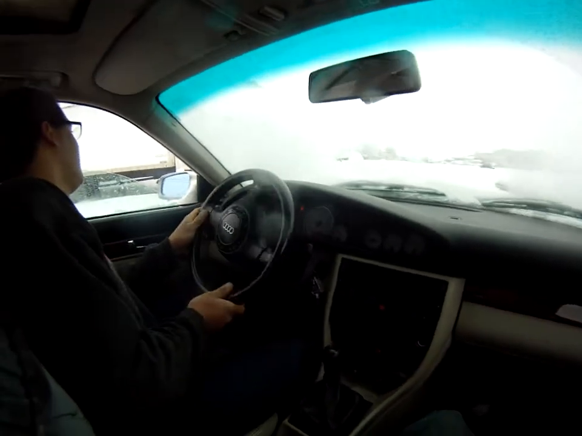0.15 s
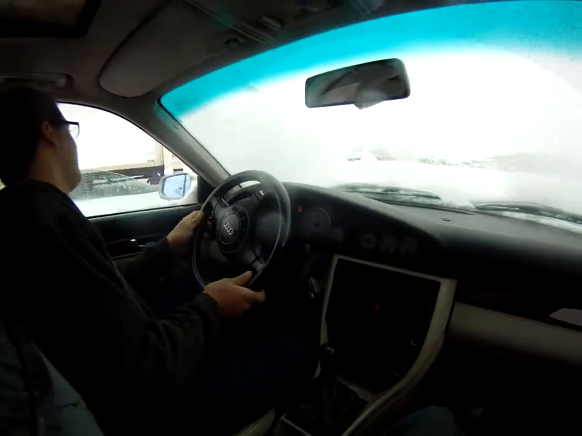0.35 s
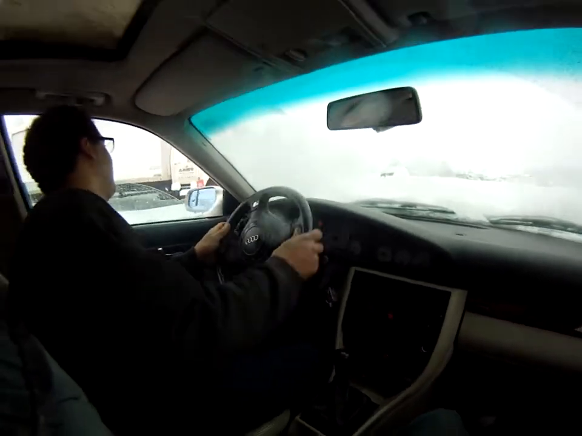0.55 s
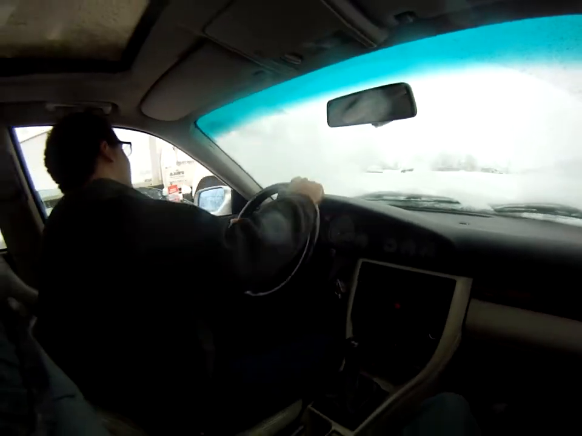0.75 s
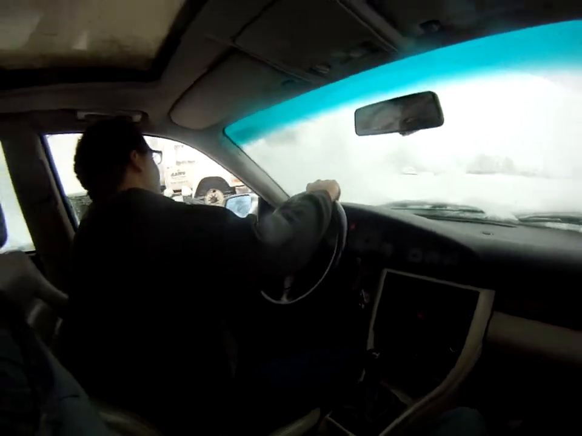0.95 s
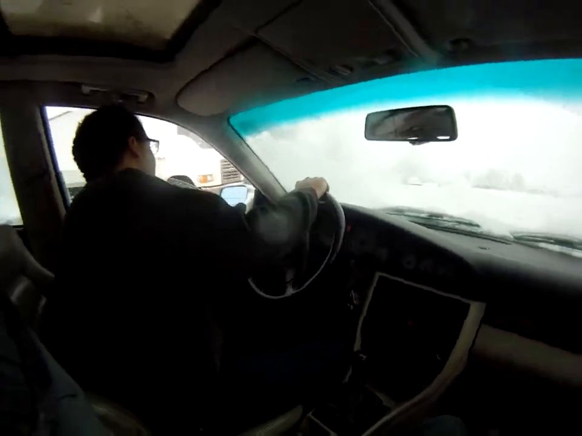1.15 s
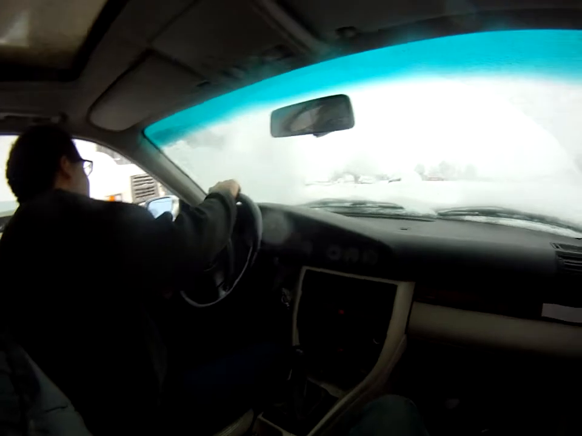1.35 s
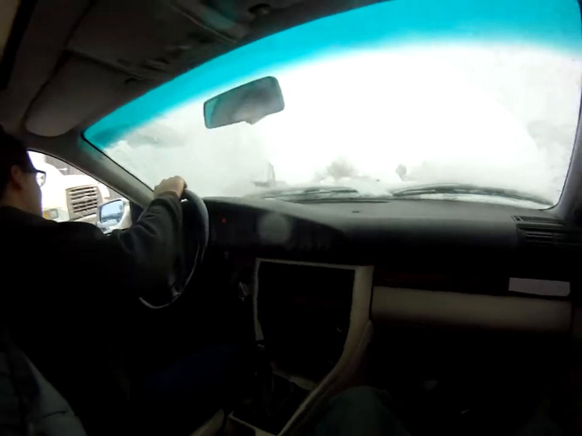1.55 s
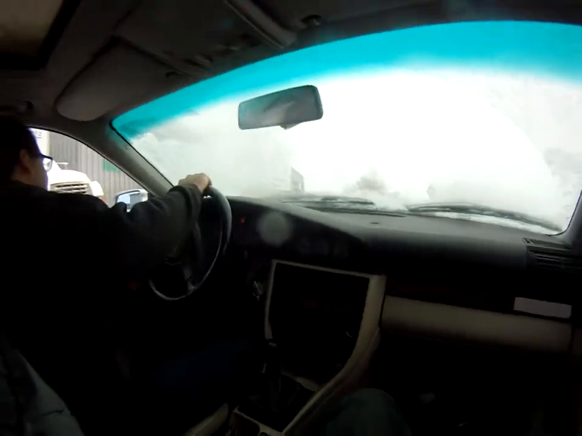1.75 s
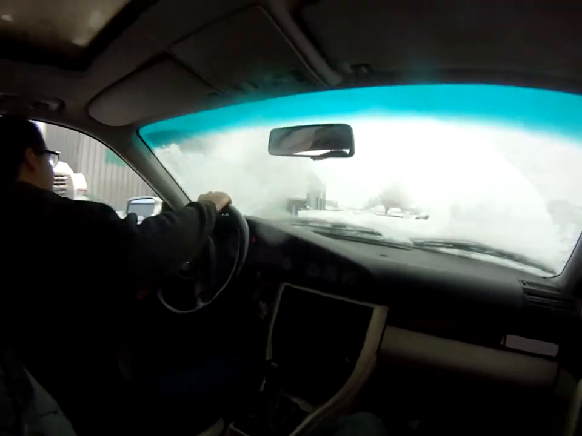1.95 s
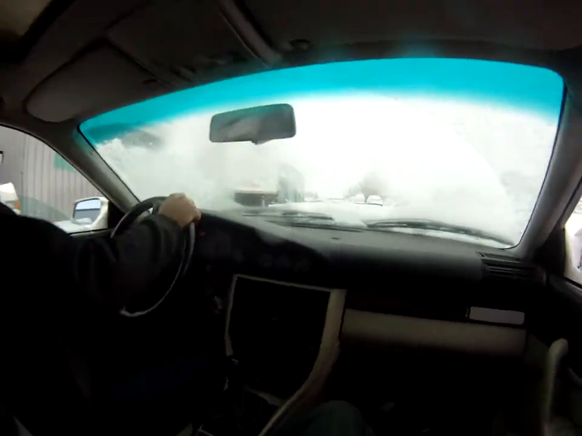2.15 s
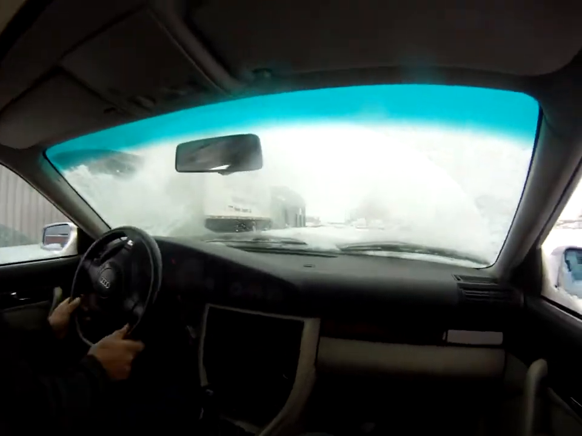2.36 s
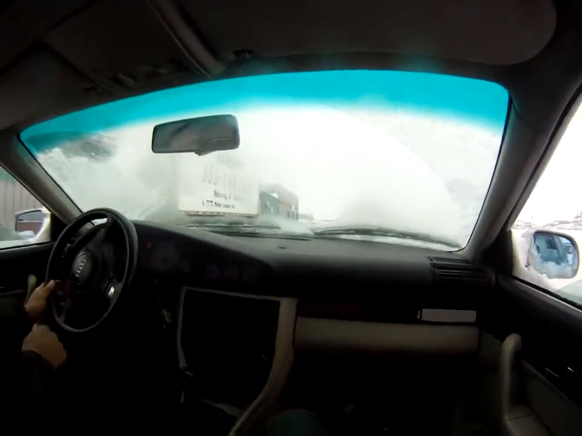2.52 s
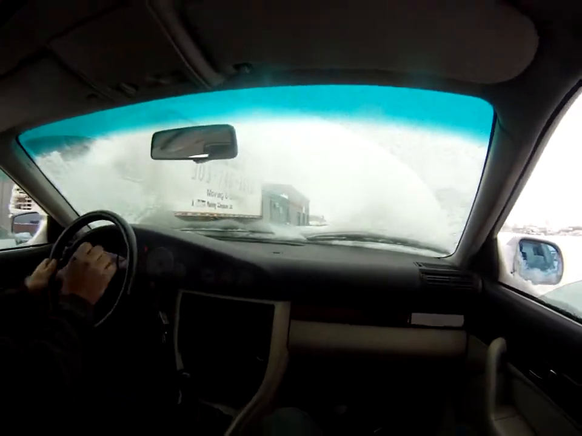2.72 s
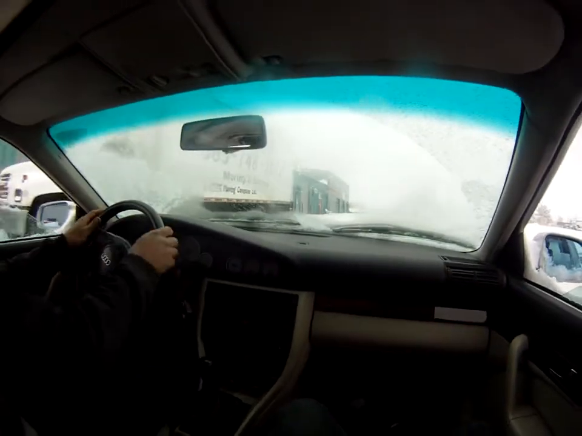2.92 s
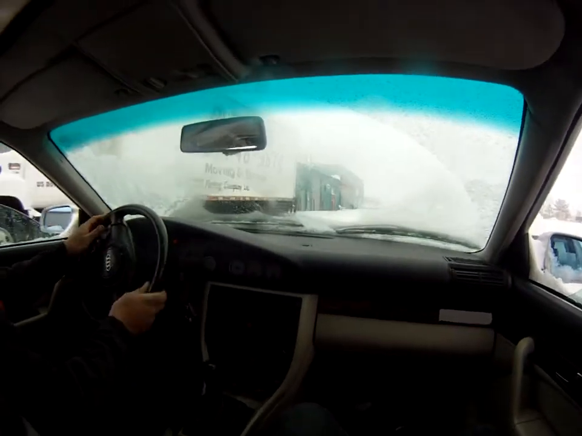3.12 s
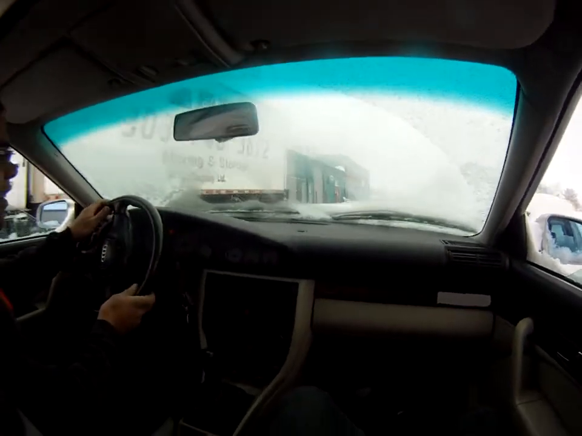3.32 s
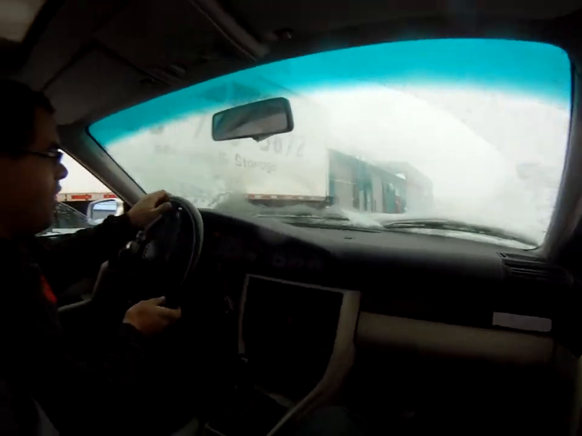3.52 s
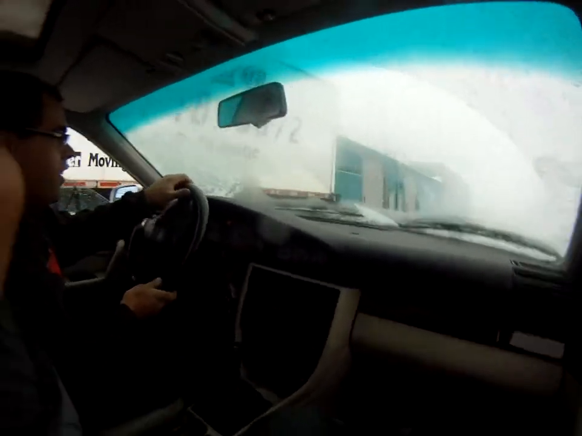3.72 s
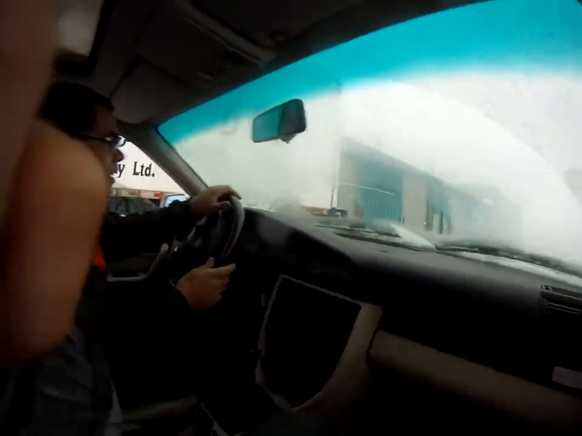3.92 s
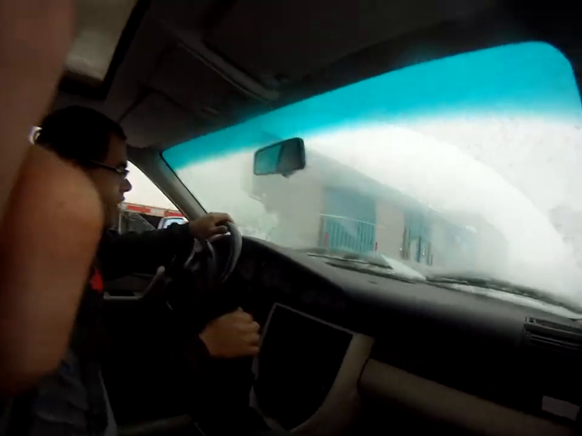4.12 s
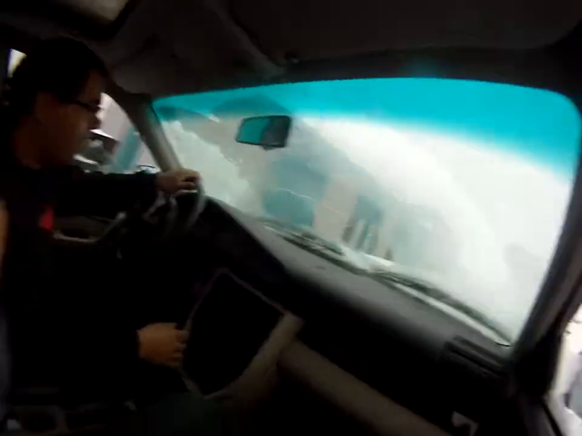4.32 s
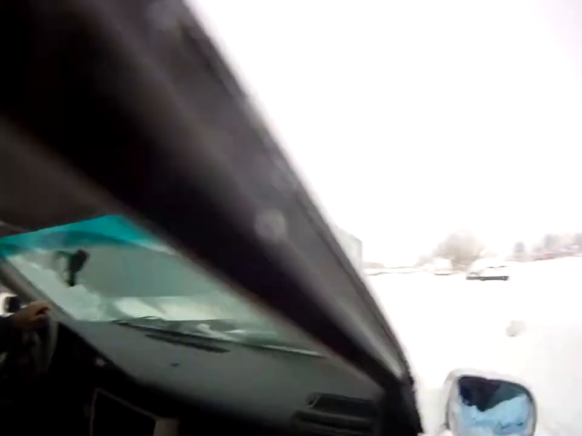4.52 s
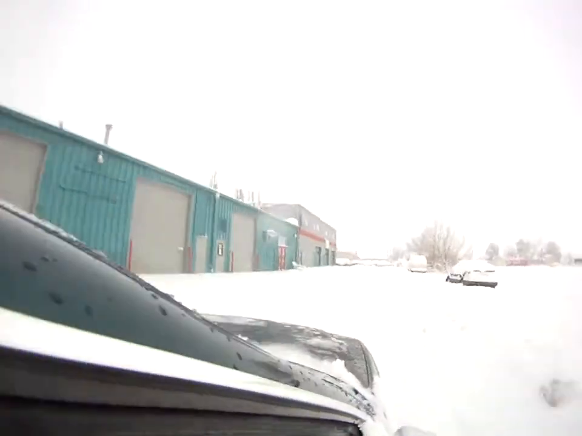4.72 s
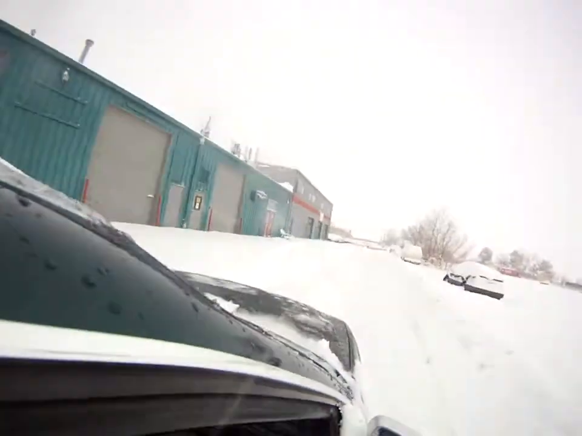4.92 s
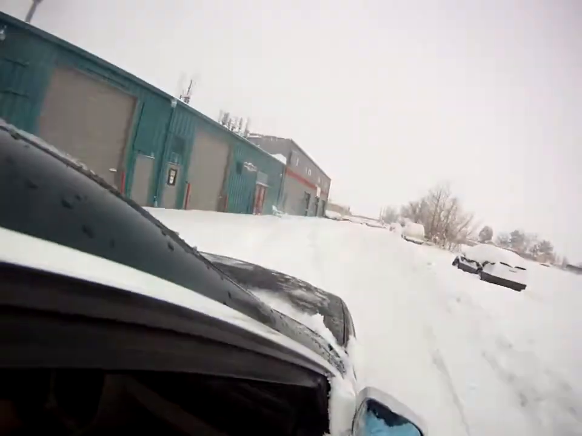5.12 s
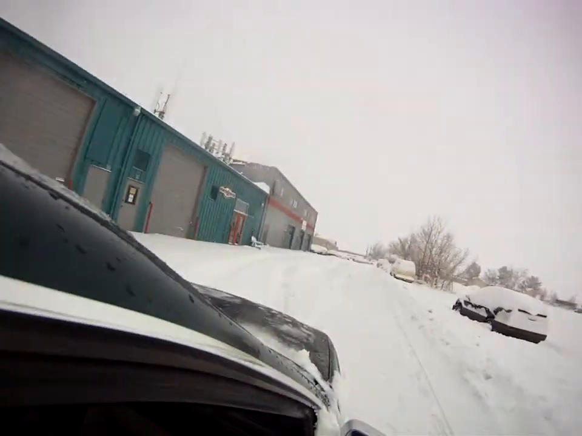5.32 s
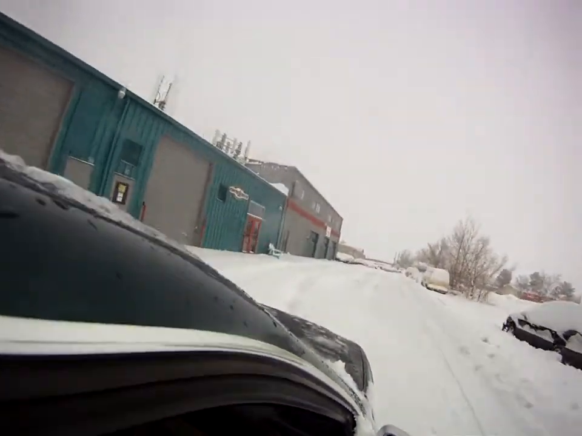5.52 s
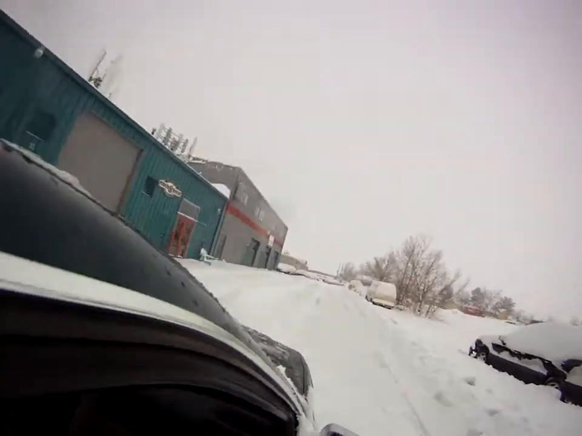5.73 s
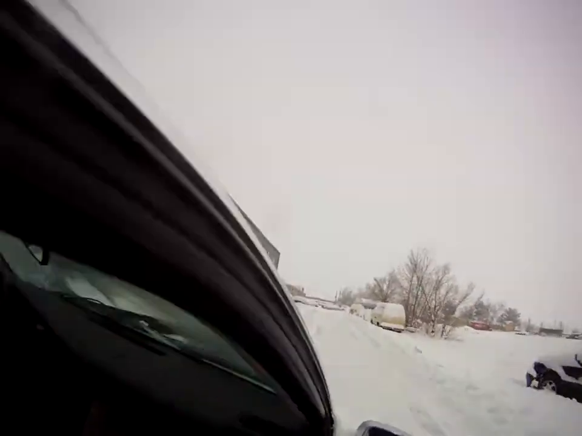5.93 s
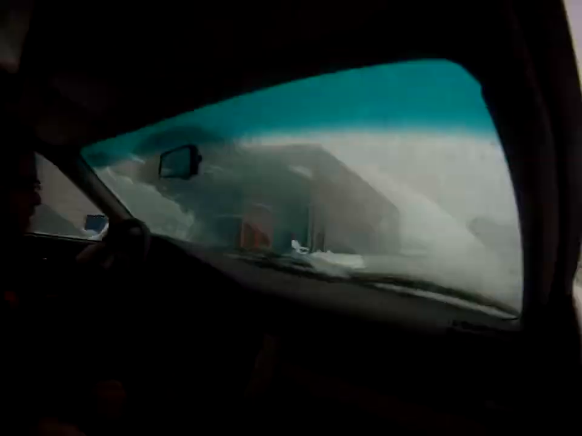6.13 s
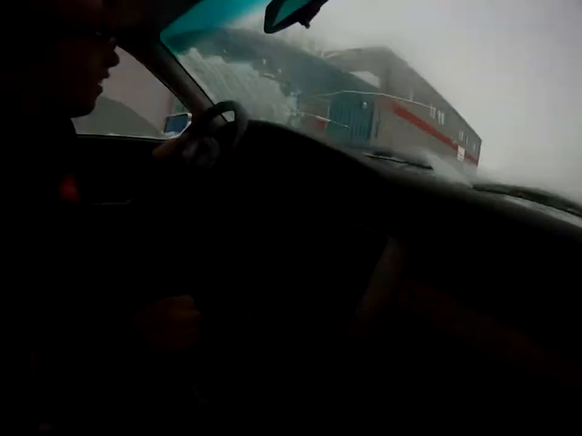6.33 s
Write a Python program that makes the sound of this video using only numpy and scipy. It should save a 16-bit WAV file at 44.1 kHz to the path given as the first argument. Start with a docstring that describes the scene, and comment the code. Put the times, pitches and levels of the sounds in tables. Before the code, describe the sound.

A muffled, lo-fi car cabin: dull tyre and body rumble, faint hiss, engine hum slowly rising, occasional tiny ticks. Then very loud, close plastic clacks, thumps and rubbing from a hand gripping the microphone's shell. Next comes a steady coarse rush of snow grains striking the shell, peppered with harder pats over gusting low wind and a revving engine. The spray stops abruptly, a knock follows, and only muffled quiet remains.

```python
"""Shelled camera in a snowbound car

A small camera in a closed plastic shell rides in a car that speeds up through snow. At first the cabin is heard
muffled: filtered-noise rumble, engine orders as sines and faint ticks. Fingers then knock the shell (force pulses
through resonances) and rub it (dense grains). Held out of the window it is pelted by snow spray, struck by lumps
and buffeted by wind (swelling noise), then it is pulled back in. One microphone, coarsely sampled."""
import sys
import numpy as np
from scipy import signal
from scipy.fft import rfft, irfft, next_fast_len
from scipy.io import wavfile
from scipy.ndimage import uniform_filter1d

SR = 44100
rng = np.random.default_rng(int(sys.argv[2]) if len(sys.argv) > 2 else 0)


def transcribe(u):
    """Save the signal u as a 16-bit wav file named by the first command-line argument.

    u: samples, shape (n,) or (channels, n), limited to [-1, 1]; the rate is SR.
    q: integer samples, one column per channel.
    """
    v = np.clip(np.atleast_2d(u).T, -1, 1)
    q = np.round(v * 32767).astype(np.int16)
    wavfile.write(sys.argv[1], SR, q)


N = 280917

# Resonances of the shell, and a dip just below half the converter rate.
# Each row: centre in Hz, width in Hz, gain in dB.
SHELL_RESPONSE = [(1000, 85, 4.5), (1222, 1070, 15), (1803, 600, 6.5), (2290, 860, 18), (3552, 690, 16),
                  (5030, 1730, 12), (5900, 310, -11)]
# Blows on the shell. Each row: start in seconds, peak level in dB, favoured pitch in Hz.
KNOCKS = [(3.7842, -6, 5000), (3.8482, -5, 1850), (3.978, -5, 1500), (3.9812, -9, 1900), (4.0335, 0, 5100),
          (4.0362, -10, 1900), (4.0382, -9, 4000), (4.113, -28, 1500), (4.185, -24, 950),
          (4.3467, -7, 1300), (4.3537, -2, 1900), (4.365, -22, 3500), (4.568, -35, 2500), (4.842, -20, 900),
          (5.0302, -10, 1100), (5.0311, -10, 1200), (6.2033, -8, 3000)]
# Lumps of snow on the shell. Each row: start in seconds, peak level in dB, favoured pitch in Hz.
SNOW_LUMPS = [(4.875, -19, 2340), (4.948, -20, 3560), (5.099, -15, 4300), (5.1825, -13, 2980),
              (5.228, -21, 4800), (5.254, -16, 1400), (5.302, -17, 5000), (5.3305, -17, 2570),
              (5.494, -20, 2860), (5.521, -19, 3530), (5.6145, -17, 3240), (5.7265, -16.5, 3220),
              (5.8155, -18, 3300), (5.858, -15, 2930), (5.928, -14, 4860)]
# Faint short ticks, dull or bright, while in the cabin.
# Each row: start in seconds, peak level in dB, favoured pitch in Hz.
TICKS = [(.265, -45, 3600), (.289, -47.5, 3580), (1.268, -42, 3820), (1.342, -47.5, 2900),
         (1.433, -49.5, 4000), (1.542, -41, 5600), (1.555, -46, 5660), (1.563, -44.5, 5600),
         (1.612, -47, 2400), (1.882, -43, 3150), (2.136, -28, 1680), (2.312, -46, 3480), (2.468, -46, 3540),
         (2.512, -37.5, 1450), (3.008, -48, 2300), (3.099, -44.5, 2520), (3.319, -45.5, 3108),
         (3.509, -33, 880), (3.641, -45, 3600)]
# Shoves of the whole shell. Each row: start in seconds, starting level in dB, swing frequency in Hz.
THUMPS = [(2.136, -37.5, 150), (3.7845, -23, 109), (3.8482, -17.5, 59), (3.979, -43, 240),
          (3.9818, -12, 99), (4.0333, -28, 100.6), (4.115, -26.5, 70), (4.184, -28, 99),
          (4.3465, -22.5, 60.3), (4.364, -28, 60), (4.844, -26.5, 100), (5.0307, -19.5, 118),
          (5.0312, -25.5, 264), (6.002, -29, 54.5), (6.158, -38, 70), (6.192, -30.5, 59.6)]
# Skin and cloth dragged over the shell. Each row: touch in seconds, firmest moment in seconds,
# lift in seconds, firmest level in dB, brightness from 0 to 1.
RUBS = [(3.541, 3.56, 3.665, -56, .57), (3.787, 3.788, 3.817, -33, .25), (3.817, 3.818, 3.848, -48, .35),
        (3.849, 3.85, 3.966, -28.5, .24), (3.975, 3.99, 3.997, -28, .7), (3.999, 4.03, 4.11, -42, .3),
        (4.11, 4.148, 4.182, -25.5, 1), (4.182, 4.19, 4.254, -36, .24), (4.295, 4.35, 4.381, -33, .05),
        (4.381, 4.382, 4.45, -52, .14), (4.45, 4.46, 4.558, -49, .05), (6.072, 6.082, 6.092, -44, .1),
        (6.12, 6.16, 6.19, -55, .2), (6.19, 6.206, 6.258, -34, .25), (6.262, 6.28, 6.35, -55, .2)]
# Wind buffeting the shell. Each row: time in seconds, level in dB.
GUSTS = [(4.56, -56), (4.75, -45), (4.95, -48), (5.23, -45.5), (5.45, -49), (5.7, -46), (5.84, -57),
         (5.99, -40.5), (6.12, -72), (6.2, -66), (6.37, -73)]
# Chance swells of the low boom. Each row: centre in seconds, level in dB.
SWELLS = [(.03, -54.5), (.45, -59), (1.03, -59), (1.6, -63), (2.2, -54.5), (2.58, -53.5), (3.53, -57)]
# Spectrum of the tyre and wind roar. Each row: frequency in Hz, relative density in dB per Hz.
ROAR_SPECTRUM = [(35, -12.5), (60, -8.5), (75, -4.5), (119, 1), (172, -7), (418, -16), (800, -30),
                 (1040, -92), (1760, -120)]
# Course of the engine. Each row: time in seconds, firing-cycle rate in Hz, load in dB.
ENGINE_COURSE = [(0, 27, -77), (1.1, 30.5, -67), (1.9, 26.5, -62.5), (2.55, 32.32, -60), (2.8, 35.46, -60),
                 (3.15, 38.93, -63), (3.6, 46.5, -55.5), (4.05, 45, -65), (4.4, 53, -52), (4.75, 57.9, -63),
                 (5.05, 54.38, -52), (5.35, 62, -55.5), (5.75, 73, -50.5), (6.37, 75, -85)]
# Engine orders. Each row: multiple of the firing-cycle rate, level in dB relative to the load.
ENGINE_ORDERS = [(2, 7), (2.5, -12), (3, 2), (3.5, -12), (4, 2), (5, -8), (6, -9), (7, -14), (8, -3),
                 (10, -10)]
# Cabin resonances. Each row: centre in Hz, width in Hz, gain in dB.
CABIN_MODES = [(125.6, 25, 2), (199, 35, -2.5), (256, 43, -4), (318, 35, -1)]
# Spectrum of the cabin hiss. Each row: frequency in Hz, relative density in dB per Hz.
HISS_SPECTRUM = [(240, -10), (400, -11.5), (546, -6.5), (645, -7.5), (984, -4.5), (1270, -8), (1370, -9.5),
                 (2030, -11.5), (2320, -5), (2740, -12.5), (3270, -16), (3910, -12.5), (5700, -18),
                 (7410, -64), (12500, -120)]
# How far the channels differ. Each row: frequency in Hz, side minus mid in dB.
CHANNEL_DIFFERENCE = [(30, -50), (125, -39), (300, -27), (600, -24), (1200, -30), (2200, -33), (4500, -32),
                      (9000, -31), (13000, -24)]


def from_db(db):
    """Amplitude ratio: 20 dB is a factor of ten."""
    return 10 ** (np.asarray(db) / 20)


def rms_one(x):
    """Normalisation of a signal to unit effective value."""
    return x / np.sqrt(np.mean(x ** 2) + 1e-20)


def in_time(rows):
    """Linear interpolation: each column after the time becomes a curve over all samples."""
    s, *columns = np.transpose(rows)
    return [np.interp(np.arange(N) / SR, s, c) for c in columns]


def drift(rate_hz):
    """Slow fluctuation of unit rms: noise at every 20th sample through a double one-pole low-pass."""
    r = np.exp(-40 * np.pi * rate_hz / SR)
    noise = rng.standard_normal(N // 20 + 4002)
    slow = signal.lfilter([1], [1, -2 * r, r * r], noise)[4000:]   # the filter has settled
    return np.interp(np.arange(N) / 20, np.arange(len(slow)), rms_one(slow))


def band(x, low_hz, high_hz):
    """Band limitation by a Butterworth filter."""
    return signal.sosfilt(signal.butter(2, [low_hz, high_hz], "band", fs=SR, output="sos"), x)


def shaped(x, spectrum):
    """Spectral weighting: multiplication by a dB curve over log frequency."""
    hz, db = np.transpose(spectrum)
    size = next_fast_len(N)
    grid = np.maximum(np.arange(size // 2 + 1) * SR / size, 1)
    gain = from_db(np.interp(np.log(grid), np.log(hz), db))
    return irfft(rfft(x, size) * gain, size)[:N]


def coloured(spectrum):
    """Stationary noise of unit rms with the given spectrum, falling away below it towards 5 Hz."""
    return rms_one(shaped(rng.standard_normal(N), [(5, -90)] + spectrum))


def peak(x, hz, width_hz, db):
    """Second-order resonance that lifts or cuts around one frequency."""
    a, w = from_db(db / 2), 2 * np.pi * hz / SR
    q = np.sin(w) * width_hz / hz / 2
    return signal.lfilter([1 + q * a, -2 * np.cos(w), 1 - q * a], [1 + q / a, -2 * np.cos(w), 1 - q / a], x)


def shell(force, brightness=0.46):
    """Modal excitation: soft contacts drive the lower modes of the shell, hard ones the upper."""
    x = force
    treble = from_db(26 * (np.clip(brightness, 0, 1) - .4))
    for _ in range(2):
        low = signal.lfilter([.3], [1, -.7], x)
        x = low + treble * (x - low)
    for hz, width_hz, db in SHELL_RESPONSE:
        x = peak(x, hz, width_hz, db)
    return x


def grains(per_s, spread_db, bed):
    """Shot noise: dense grains of uneven size in clumps, on a bed of fine noise."""
    sizes = from_db(spread_db * np.minimum(rng.exponential(1, N), 5)) * rng.choice([-1, 1], N)
    born = rng.random(N) < per_s * from_db(5.0 * drift(60)) / SR
    fine = rng.standard_normal(N) * from_db(2.0 * drift(26))
    return rms_one(sizes * born) + bed * fine


def blows(rows, crunch_ms, focus_db, wall_db):
    """Impact: a sharp contact, then a decaying crunch, 20 dB down after crunch_ms, drives the shell.

    The struck spot favours modes near one pitch, and the wall of the shell flexes under the blow."""
    out, t = np.zeros(N), np.arange(2000) / SR
    decay = np.exp(-t * 1000 / crunch_ms * np.log(10))
    for s, peak_db, spot_hz in rows:
        force = 0.41 * rng.standard_normal(len(t)) * decay
        force[0] = -1   # the sharp contact
        hardness = .49 + 0.087 * np.log2(spot_hz / 2500)   # higher spots are struck harder
        sound = shell(peak(force, spot_hz, 0.71 * spot_hz, focus_db), hardness)
        sound = peak(sound, 880, 480, wall_db)   # flexing of the wall
        i = round(s * SR)
        out[i:i + len(t)] += (from_db(peak_db) * sound / np.abs(sound).max())[:N - i]
    return out


def thumps():
    """Damped oscillation: a shove of the whole shell is one low, quickly decaying swing."""
    cycles, jolt = 3.56, 0.91   # swings until 60 dB down; starting phase in radians, a sudden jolt
    out, t = np.zeros(N), np.arange(6000) / SR
    for s, start_db, hz in THUMPS:
        swing = from_db(start_db - 60 * t * hz / cycles) * np.sin(2 * np.pi * hz * t + jolt)
        i = round(s * SR)
        out[i:i + len(t)] += swing[:N - i]
    return out


def rubs():
    """Friction: grainy force that presses in quickly, eases off slowly and lets go within milliseconds."""
    press_db_per_s, ease_db_per_s = 400, 114.5
    out, force = np.zeros(N), grains(4000, 3.1, 1.04)
    for touch, firmest, lift, db, brightness in RUBS:
        i, j = round(touch * SR), min(round((lift + .004) * SR), N)
        release = np.minimum(np.arange(j - i)[::-1] / (.008 * SR), 1)
        since = np.arange(i, j) / SR - firmest
        pressure_db = db + np.minimum(press_db_per_s * since, -ease_db_per_s * since)
        out[i:j] += release * from_db(pressure_db) * rms_one(shell(force[i:j], brightness))
    return out


def spray():
    """Multiple impact: snow grains pelt the shell, softer and duller in the lee of the window frame."""
    out_s, in_s = 4.568, 6.06   # first and last contact with the airstream
    start_db, sag_db_per_s, lee_db = -33, -1.82, -16
    airstream_bright, lee_bright = 0.42, 0.41
    t = np.arange(N) / SR
    # 0 in the cabin, 1 in the full airstream, with a ramp each way through the window
    exposure = np.interp(t, [out_s, out_s + 0.081, in_s - 0.078, in_s], [0, 1, 1, 0])
    level_db = start_db + sag_db_per_s * (t - out_s) + lee_db * (1 - exposure)
    brightness = lee_bright + (airstream_bright - lee_bright) * exposure + 0.053 * drift(9.5)
    return (exposure > 0) * from_db(level_db) * rms_one(shell(grains(2500, 3.87, 0.94), brightness))


def rumble():
    """Broadband excitation: lumpy boom of the body and roar of tyres in snow; grip and wind add to both."""
    cabin_boom_db, cabin_roar_db = -55, -60
    grip_s, grip_boom_db, grip_roar_db = 3.78, -42.5, -52
    t = np.arange(N) / SR
    # the hand closes on the shell and shakes it, less as it settles
    shaking = (t > grip_s) * (0.052 + np.exp(-(t - grip_s) / 0.82))
    wind = (t > GUSTS[0][0]) * (t < GUSTS[-1][0]) * from_db(in_time(GUSTS)[0])
    swells = sum(from_db(db) * np.exp(-((t - s) / 0.064) ** 2) for s, db in SWELLS)
    boom_level = from_db(cabin_boom_db + 1.4 * drift(2.7)) + swells
    boom_level += from_db(grip_boom_db) * shaking + from_db(-12) * wind   # less wind in the deepest bass
    roar_level = from_db(cabin_roar_db) + from_db(grip_roar_db) * shaking + wind
    boom = rms_one(band(rng.standard_normal(N), 15.0, 46))
    boom = rms_one(boom / uniform_filter1d(boom ** 2, size=3000) ** .25)   # the swings stay fairly even
    roar = from_db(2 * drift(12)) * coloured(ROAR_SPECTRUM)
    return boom_level * boom + roar_level * roar


def engine():
    """Harmonic series: orders of the firing cycle waver, and swell where they cross cabin resonances."""
    rate_hz, load_db = in_time(ENGINE_COURSE)
    phase = 2 * np.pi * np.cumsum(rate_hz * (1 + 0.0053 * drift(2.4))) / SR
    out = np.zeros(N)
    for k, db in ENGINE_ORDERS:
        cabin = sum(from_db(top_db) / (1 + (2 * (k * rate_hz - hz) / width_hz) ** 2)
                    for hz, width_hz, top_db in CABIN_MODES)
        tone = np.sin(k * phase + rng.uniform(0, 2 * np.pi))
        out += cabin * from_db(db + 2 * drift(2.5)) * tone
    return from_db(load_db) * out


def buzz():
    """Forced vibration: the shaken shell buzzes faintly, as grains through its modes."""
    return from_db(-71.0 + 0.97 * drift(5.5)) * rms_one(shell(grains(1500, 2.8, 1.5)))


def hiss():
    """Random noise: the cabin hiss has a fixed spectrum and a slightly wavering level."""
    return from_db(-64.5 + 1.0 * drift(16)) * coloured(HISS_SPECTRUM)


def scene():
    """Superposition: the pressures of all sources add at one microphone, which feeds both channels."""
    contacts = blows(KNOCKS, crunch_ms=2.81, focus_db=11.5, wall_db=8.5) + thumps()
    contacts += blows(SNOW_LUMPS, crunch_ms=3.08, focus_db=11.5, wall_db=5.0)
    contacts += blows(TICKS, crunch_ms=5.28, focus_db=9.0, wall_db=9.0)
    mono = contacts + rubs() + spray() + rumble() + engine() + buzz() + hiss()
    return np.array([mono, mono])


def top_cut(x):
    """Nothing passes above the cut-off."""
    return signal.sosfilt(signal.butter(12, 16410, fs=SR, output="sos"), x)


def record(dry):
    """Sample and hold: each slow sample lasts four steps, mirroring the spectrum about half and full rate."""
    converter_hz = 12000
    slow = signal.resample_poly(dry, converter_hz, SR, axis=1)
    held = signal.resample_poly(np.repeat(slow, 4, axis=1), SR, 4 * converter_hz, axis=1)
    x = np.pad(held, ((0, 0), (0, 8)))[:, :N]
    low_pass = signal.cheby2(14, 14, 15350, fs=SR, output="sos")   # order, stop-band dB per pass, edge in Hz
    x = signal.sosfiltfilt(low_pass, x)
    # the channels differ by a faint noise that follows the signal
    x = x + shaped(x[0], CHANNEL_DIFFERENCE) * drift(60) * [[1], [-1]]
    mix = np.clip(x, -1, 1)
    return top_cut(mix)


dry = scene()
out = record(dry)
transcribe(out)
```